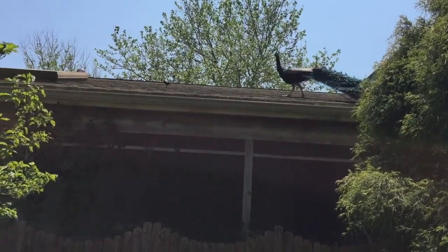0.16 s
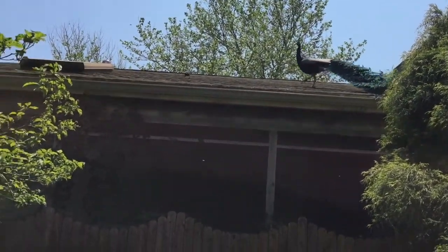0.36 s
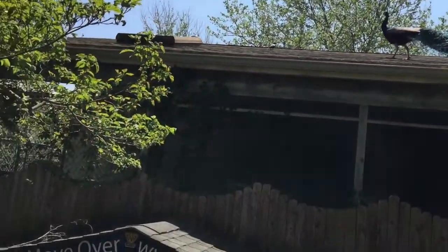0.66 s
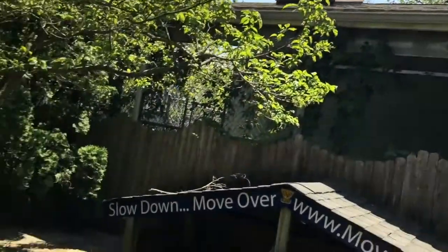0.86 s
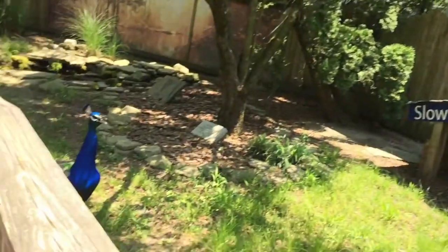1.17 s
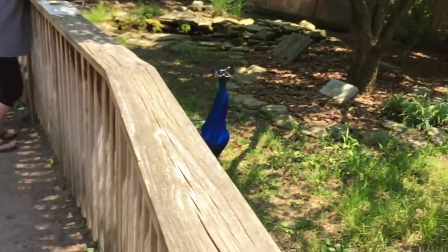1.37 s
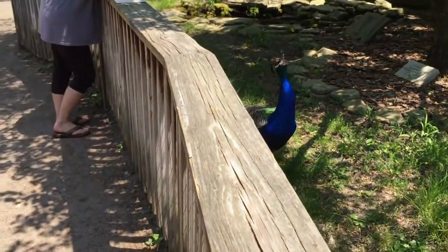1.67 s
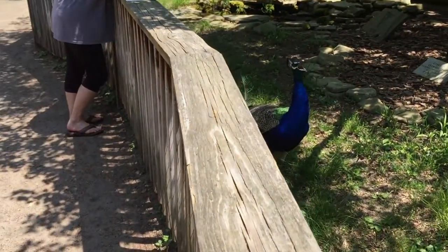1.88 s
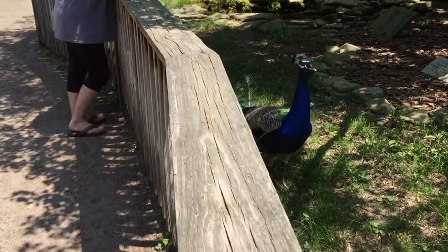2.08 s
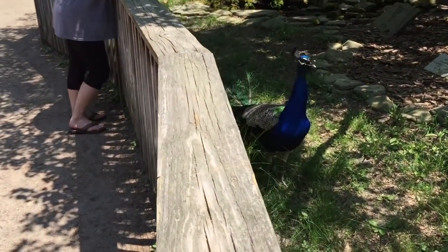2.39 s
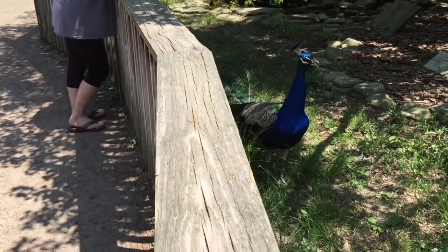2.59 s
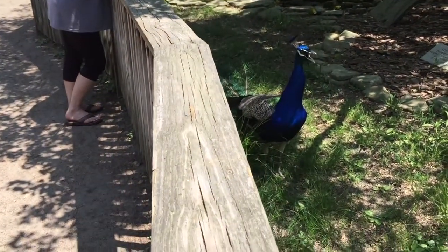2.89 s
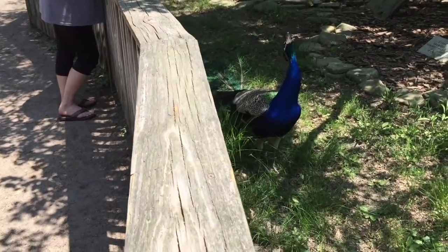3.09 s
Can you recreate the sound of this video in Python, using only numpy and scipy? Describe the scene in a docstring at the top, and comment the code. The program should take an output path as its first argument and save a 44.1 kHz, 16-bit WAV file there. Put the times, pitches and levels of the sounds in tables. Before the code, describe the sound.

Close peacock calls, nasal and brassy with rough breaks, echo lightly off fence, building and trees; between them come quiet outdoor air, distant low hum, a small bird's chirps and one tiny tick.

```python
"""A peacock wails three times close by in an outdoor enclosure; the last wail is cut off by the end.
Each call is a reedy pulse tone of summed harmonics, shaped by two throat resonances and a brassy treble, with rough
breaks; in the first two its weight drops from the upper resonance to the lower. Fence, building and trees echo it.
Behind it a small bird chirps in falling sine sweeps, something ticks in damped modes, machinery hums far off in
wavering sines and the open air washes as coloured noise. The recorder's gain control ducks it all and recovers slowly."""
import sys
import numpy as np
from scipy import signal
from scipy.fft import rfft, irfft
from scipy.io import wavfile
from scipy.ndimage import uniform_filter1d

SR = 44100
rng = np.random.default_rng(int(sys.argv[2]) if len(sys.argv) > 2 else 0)


def file_out(sig):
    """Save sig as 16-bit WAV at sys.argv[1]."""
    # one column per channel
    cols = np.atleast_2d(sig).T
    # limit, then scale
    lim = np.clip(cols, -1, 1)
    pcm = np.round(lim * 32767).astype(np.int16)
    wavfile.write(sys.argv[1], SR, pcm)


N = 143325  # 3.25 s

UPPER_WIDTH_HZ = 303  # width of the upper throat resonance
TREBLE_FROM_HZ, HIGH_FROM_HZ = 2710, 5060  # lower edges of the treble and the high treble
JITTER_HZ = 350  # speed of the voice's irregularity
RELEASE_S = 0.012


def undb(db):
    """Decibels to gain."""
    return 10 ** (np.asarray(db) / 20)


def unit(x):
    """Scale to rms 1."""
    return x / np.sqrt(np.mean(x ** 2))


def walk(rate_hz):
    """Random wander with spread 1, drawn on a coarse grid and slower than about rate_hz."""
    size = 8192
    f = np.arange(size // 2 + 1) * SR / N
    spectrum = rfft(rng.standard_normal(size)) / (1 + (f / rate_hz) ** 4)
    coarse = unit(irfft(spectrum))
    return np.interp(np.arange(N) * size / N, np.arange(size), coarse)


def noise(points):
    """Noise of rms 1, coloured by (f/Hz, level/dB) points joined on a logarithmic frequency axis."""
    hz, db = np.array(points, float).T
    f = np.arange(N // 2 + 1) * SR / N + 1e-9
    colour = undb(np.interp(np.log(f), np.log(hz), db))
    return unit(irfft(rfft(rng.standard_normal(N)) * colour, N))


def bell(x, centre, width):
    """Gaussian hump of height 1; width is its standard deviation."""
    return np.exp(-.5 * ((x - centre) / width) ** 2)


def wavering_tones(rows):
    """Steady sines of (f/Hz, level/dB) whose pitch and level wander a little."""
    waver_hz = 0.57
    total = 0
    for hz, db in rows:
        level = undb(db + walk(4.1))
        phase = 2 * np.pi * np.cumsum(hz + waver_hz * walk(5.0)) / SR
        total = total + level * np.sqrt(2) * np.sin(phase)
    return total


def yard(x):
    """Diffuse echo of trees and walls: decaying noise whose treble dies first."""
    t60_s, treble_t60_s = 0.69, 0.48
    t = np.arange(SR) / SR
    hiss = rng.standard_normal(SR)
    low = signal.sosfilt(signal.butter(2, 1800 / (SR / 2), output="sos"), hiss)
    tail = low * np.exp(-np.log(1000) * t / t60_s)
    tail += 0.71 * hiss * np.exp(-np.log(1000) * t / treble_t60_s)
    tail *= np.minimum(t / 0.022, 1)  # the echoes gather over 22 ms
    return signal.fftconvolve(x, tail / np.sqrt(np.sum(tail ** 2)))[:N]


def open_air_wash():
    """Wash of the open air: coloured noise whose level drifts."""
    # spectrum of the wash: (f/Hz, relative level/dB per Hz)
    wash_colour = [(25, -22), (62, 1.5), (100, -4.5), (170, -7), (260, -10), (430, -16), (650, -11.5),
                   (1200, -12.5), (1700, -10.5), (2800, -14), (4200, -17.5), (5000, -29), (6400, -27.5),
                   (9500, -36.5), (15500, -42)]
    # middle of the drifting level: (t/s, level/dB)
    wash_level = [(0, -36.5), (.8, -44.5), (1.3, -43.5), (1.9, -46), (2.3, -51), (2.7, -46), (3.25, -43)]
    t = np.arange(N) / SR
    level_db = np.interp(t, *np.array(wash_level).T) + 2.6 * walk(2.1)
    return undb(level_db) * noise(wash_colour)


def soft_swell():
    """A soft rush with a little rumble: coloured noise that swells once."""
    # spectrum of the rush: (f/Hz, relative level/dB per Hz)
    rush_colour = [(30, -13.5), (65, 4), (130, -20), (400, -13), (620, 3.5), (850, 2), (1500, -8),
                   (8000, -51)]
    peak_s, spread_s, peak_db = 2.72, 0.36, -45
    return undb(peak_db) * bell(np.arange(N) / SR, peak_s, spread_s) * noise(rush_colour)


def distant_hum():
    """Distant machinery: low wavering sines that recede after a while."""
    # lines of the hum before it recedes: (f/Hz, mean level/dB)
    hum_lines = [(66, -60.5), (140.5, -49), (233, -64)]
    fade_from_s, fade_db_per_s = 0.98, -5
    t = np.arange(N) / SR
    return wavering_tones(hum_lines) * undb(fade_db_per_s * np.maximum(t - fade_from_s, 0))


def passing_whine():
    """A faint whine of wavering sines that comes and goes."""
    # lines of the whine at its strongest: (f/Hz, mean level/dB)
    whine_lines = [(701, -50), (934, -55.5)]
    peak_s, spread_s = 0.89, 0.13
    return wavering_tones(whine_lines) * bell(np.arange(N) / SR, peak_s, spread_s)


def tick():
    """One small dry tick near the microphone: struck modes that die within milliseconds."""
    # modes of the ticking object: (f/Hz, level/dB relative to the tick, t60/s)
    tick_modes = [(2060, -4, 0.021), (2320, -5, 0.016), (3920, -3, 0.017), (6400, -9.5, 0.0095),
                  (12500, -8, .003)]
    tick_s, tick_db = 1.3008, -23.5
    t = np.maximum(np.arange(N) / SR - tick_s, 0)
    modes = 0
    for hz, db, t60 in tick_modes:
        modes = modes + undb(db) * np.exp(-np.log(1000) * t / t60) * np.sin(2 * np.pi * hz * t)
    return undb(tick_db) * modes


def small_bird():
    """A small bird's slightly buzzy down-slurs: falling sines, smeared by the leaves of the trees."""
    # chirps before leaves and yard: (t/s, length/s, start f/Hz, end f/Hz, peak level/dB)
    chirps = [(0.895, 0.037, 4470, 3950, -40.5), (0.917, 0.071, 3577, 3130, -33.5),
              (2.167, .06, 5240, 3700, -48), (2.855, 0.054, 4140, 4060, -37.5),
              (2.885, .025, 3750, 3420, -42)]
    buzz, yard_db, leaf_decay_s = .026, -13, .006  # buzz: share of the pitch
    t, song = np.arange(N) / SR, np.zeros(N)
    for at, length, from_hz, to_hz, db in chirps:
        progress = np.clip((t - at) / length, 0, 1)
        hz = (from_hz + (to_hz - from_hz) * progress) * (1 + buzz * walk(250))
        swell = np.sin(np.pi * progress) ** 2
        song += np.sqrt(2) * undb(db) * swell * np.sin(2 * np.pi * np.cumsum(hz) / SR)
    leaves = rng.standard_normal(N) * np.exp(-t / leaf_decay_s)
    leaves /= np.sqrt(np.sum(leaves ** 2))
    song = song + .5 * signal.fftconvolve(song, leaves)[:N]
    return song + undb(yard_db) * yard(song)


def roughness(t):
    """How rough the voice is at its breaks."""
    # rough stretches: (t/s, spread/s, roughness 0-1)
    breaks = [(0.023, .055, 0.32), (0.198, 0.029, 0.2), (1.444, 0.027, 0.6), (1.714, 0.029, 0.21),
              (2.996, 0.01, 0.6), (3.032, 0.012, 0.7)]
    return sum(amount * bell(t, at, spread) for at, spread, amount in breaks)


def pulse_phase(t, on, hz, rough):
    """Phase of the syrinx pulses, jittered most at the breaks."""
    waver, jitter, rough_jitter = .0008, .00022, .0016  # shares of the pitch
    stumble_rad = .02
    unsteady = waver * walk(27)[on] + (jitter + rough_jitter * rough) * walk(JITTER_HZ)[on]
    phase = 2 * np.pi * np.cumsum(hz * (1 + unsteady)) / SR
    return phase + stumble_rad * rough * walk(JITTER_HZ)[on]  # at a break the pulses come early or late


def near_ripple(f, k, on, flutter):
    """Short reflections make the harmonics ripple as the pitch glides; the third and up also flutter."""
    # ground and railing: (delay/s, gain)
    near_reflections = [(.0034, 0.12), (.0083, 0.11), (0.0136, 0.17)]
    ripple = 1 + sum(gain * np.exp(-2j * np.pi * f * delay) for delay, gain in near_reflections)
    wander = np.array([walk(20)[on] + 1j * walk(18)[on] for _ in k[2:]])
    ripple[2:] += flutter * np.minimum(np.sqrt(k[2:] / 3), 2) * wander
    return ripple


def brassy_treble(f, k, on, rough, ripple, high_db):
    """Brassy colour of the harmonics; it softens toward the top when the high treble is weak."""
    # colour of the treble: (f/Hz, relative level/dB)
    treble_colour = [(2800, 9), (3250, -2.5), (3850, 3), (4400, -3.5), (5100, -12.5), (5750, -9.5),
                     (6400, -9.5), (7400, -18), (9400, -19), (10400, -27.5), (12000, -24.5), (15500, -29.5)]
    flicker_db = 6.5  # spread at full roughness
    soft_tilt, brassy_db = 0.061, -49  # dB per octave lost for each dB of high treble below brassy_db
    flicker = undb(np.array([flicker_db * rough * walk(100)[on] for _ in k]))
    brass = undb(np.interp(f, *np.array(treble_colour).T)) * flicker * np.abs(ripple)
    octaves_up = np.maximum(np.log2(f / HIGH_FROM_HZ), 0)
    return brass * undb(-soft_tilt * np.maximum(brassy_db - high_db, 0) * octaves_up)


def fundamental(t, on, upper_db):
    """Size of the fundamental, which follows the upper resonance and briefly thins out."""
    # hollows in the fundamental: (t/s, spread/s, level change/dB)
    hollows = [(0.255, 0.014, -21), (1.463, 0.0082, -14), (1.59, 0.018, -9.5), (3.03, .013, -1)]
    full_db, full_voice_db = -36, -18.5  # fundamental and upper resonance at full voice, before voice gain
    growth, flicker_db = 0.38, 2  # dB per dB of the upper resonance; dB spread
    size = undb(full_db + growth * (upper_db - full_voice_db) + flicker_db * walk(11)[on])
    return size * undb(sum(db * bell(t, at, spread) for at, spread, db in hollows))


def ringing_lag(f, upper_hz):
    """Each resonance delays the harmonics near it, so that a pulse rings through the whole cycle."""
    # throat resonances that ring on after each pulse: [f/Hz]
    ringing = [1266, 3680, 6000, 9130]
    width_hz = 250
    lag = sum(2 * np.arctan((f - centre) / width_hz) for centre in ringing)
    return lag + 2 * np.arctan((f - upper_hz) / UPPER_WIDTH_HZ)


def breath(on, phase, rough, effort, high_db):
    """Air hiss that pulses with the voice and rises at the breaks and with the high treble."""
    air_db, rough_air_db, treble_air_db = -59, -29, -31  # relative to effort, effort and high treble
    air = noise([(1200, -10), (4000, -11.5), (7000, 1), (9500, -2), (15000, -24)])[on]
    level = effort * (undb(air_db) + undb(rough_air_db) * rough) + undb(high_db + treble_air_db)
    return air * level * (1 + np.cos(phase))


def wail(pitch, throat, flutter):
    """One call: harmonics of the syrinx through two throat resonances and a brassy treble, plus air."""
    attack_s, fade_s_per_harmonic = 0.011, .006
    stumble_shimmer, half_line_db = .16, -32.5
    clock = np.arange(N) / SR
    pitch, throat = np.array(pitch), np.array(throat)
    start, end = throat[0, 0], throat[-1, 0] + 2 * RELEASE_S
    on = (clock >= start) & (clock < end)
    t = clock[on]
    lower_db, upper_db, upper_hz, treble_db, high_db = (
        np.interp(t, throat[:, 0], column) for column in throat.T[1:])
    rough = roughness(t)
    hz = uniform_filter1d(np.interp(t, *pitch.T), size=1000, mode="nearest")  # glides rounded over 23 ms
    phase = pulse_phase(t, on, hz, rough)
    k = np.arange(1, 29)[:, None]  # harmonic numbers
    f = k * hz
    ripple = near_ripple(f, k, on, flutter)
    brass = brassy_treble(f, k, on, rough, ripple, high_db)

    def above(edge_hz):
        """Soft step up at a frequency edge."""
        return .5 + .5 * np.tanh((f - edge_hz) / 120)

    def share(weights, db):
        """Spread one band's level over its harmonics."""
        return weights / np.sqrt(np.sum(weights ** 2, axis=0) + 1e-18) * undb(db)

    size = share(bell(f, upper_hz, UPPER_WIDTH_HZ) * (k > 2), upper_db)
    size += share(brass * above(TREBLE_FROM_HZ) * (1 - above(HIGH_FROM_HZ)), treble_db)
    size += share(brass * above(HIGH_FROM_HZ), high_db)
    size[0] = fundamental(t, on, upper_db)
    size[1] = undb(lower_db)  # the second harmonic carries the lower resonance
    fade = np.clip((end - t) / (fade_s_per_harmonic * k), 0, 1)
    size *= fade ** (1 + (k > 8))  # the upper harmonics die first
    size[8:] *= 1 + stumble_shimmer * rough * walk(JITTER_HZ)[on]

    angles = k * phase - ringing_lag(f, upper_hz) + np.angle(ripple)
    tone = np.sqrt(2) * np.sum(size * np.sin(angles), axis=0)
    # lines at half the pitch spacing appear at the breaks
    tone *= 1 + undb(half_line_db) * rough * walk(39.8)[on] * np.cos(phase / 2)
    effort = np.hypot(undb(lower_db), undb(upper_db))
    air = breath(on, phase, rough, effort, high_db)
    gate = np.clip((t - start) / attack_s, 0, 1) * np.clip((end - t) / RELEASE_S, 0, 1)
    call = np.zeros(N)
    call[on] = (tone + air) * np.sin(np.pi / 2 * gate) ** 2
    return call


def peacock():
    """The close calls, dull delayed echoes from fence and building, and the diffuse yard."""
    # one table per call: (t/s, pitch f/Hz)
    call_pitch = [
        [(0.0, 612), (0.208, 626.4), (0.33, 644), (0.44, 631.5), (0.51, 615), (0.624, 569), (0.66, 537)],
        [(1.355, 556), (1.411, 593.7), (1.469, 622.6), (1.679, 649.2), (1.753, 687.8), (1.819, 692.3),
         (1.869, 683), (1.979, 641.8), (2.119, 561.1), (2.165, 533)],
        [(2.915, 566), (2.927, 565.3), (2.961, 596.7), (3.019, 621), (3.099, 636), (3.197, 644.3),
         (3.25, 655.7)],
    ]
    # one table per call, levels before voice gain: (t/s, lower resonance level/dB, upper resonance level/dB,
    # upper resonance f/Hz, treble level/dB, high treble level/dB)
    call_throat = [
        [(0.0, -22, -17.5, 2226, -27.5, -36), (0.1, -21.5, -16, 2400, -30.5, -41.5),
         (0.178, -25.5, -15.5, 2370, -29, -45.5), (0.212, -21.5, -21, 2140, -27.5, -32.5),
         (0.24, -22.5, -21.5, 2280, -27, -36), (0.258, -19, -19, 2150, -22, -37.5),
         (0.288, -13.5, -28, 2080, -27.5, -43), (0.306, -15.5, -23, 2340, -28, -38),
         (0.33, -15, -21, 2430, -35, -40.5), (0.378, -13, -31, 2320, -36, -44.5),
         (0.404, -13.5, -30, 2000, -31.5, -40.5), (0.478, -20.5, -32, 2128, -36, -40),
         (0.524, -23.5, -27.5, 1900, -33, -38.5), (0.564, -31.5, -30, 1850, -36.5, -42.5),
         (0.596, -28.5, -29.5, 1780, -38, -44), (0.645, -42, -44.5, 1720, -43.5, -53)],
        [(1.352, -53, -75, 2080, -68, -68), (1.365, -34, -21, 2055, -39.5, -53),
         (1.384, -32.5, -16, 2010, -28, -36.5), (1.424, -19, -18, 1990, -17, -24.5),
         (1.464, -20, -15.5, 2230, -29.5, -34), (1.495, -20.5, -15, 2100, -23.5, -28),
         (1.57, -20.5, -17, 2080, -19.5, -26), (1.63, -23, -14.5, 2100, -23, -26),
         (1.7, -22, -17, 2090, -21, -26), (1.748, -12.5, -32, 2360, -25.5, -34.5),
         (1.814, -13, -28.5, 2540, -43.5, -34), (1.954, -14, -55.5, 2554, -47.5, -48),
         (1.996, -19.5, -47.5, 1917, -54.5, -53), (2.08, -24.5, -39, 1770, -39.5, -54.5),
         (2.13, -46.5, -46, 1690, -49.5, -58), (2.17, -52, -90, 1654, -66, -90)],
        [(2.914, -30, -46, 1770, -48, -59), (2.923, -31, -14, 1730, -46, -50),
         (2.936, -28, -16.5, 1890, -28, -45), (2.956, -20.5, -12, 1950, -25, -35),
         (2.98, -19, -17.5, 1950, -18.5, -38.5), (2.994, -18.5, -16, 2170, -21, -25.5),
         (3.004, -18, -13.5, 2260, -22, -25.5), (3.036, -16.5, -16, 2250, -28, -34.5),
         (3.078, -19.5, -14.5, 2110, -20, -25.5), (3.13, -21.5, -14, 2080, -23.5, -30.5),
         (3.2, -25.5, -14, 2040, -27, -29), (3.24, -24, -19.5, 2070, -21.5, -21)],
    ]
    # one row per call: (strength of its echoes level/dB, flutter of the single harmonics 0-1)
    call_scatter = [(0.5, 0.21), (-4, 0.18), (-5, 0.25)]
    # fence and building: (delay/s, level/dB relative to the sound thrown at them)
    wall_echoes = [(.027, -17), (0.061, -20.5), (0.141, -33.5), (0.259, -39)]
    voice_gain_db, yard_db, echo_top_hz = 9, -24.5, 1960
    t = np.arange(N) / SR
    calls = [undb(voice_gain_db) * wail(pitch, throat, flutter)
             for pitch, throat, (_, flutter) in zip(call_pitch, call_throat, call_scatter)]
    thrown = sum(undb(db) * call for call, (db, _) in zip(calls, call_scatter))
    dull = signal.sosfilt(signal.butter(2, echo_top_hz / (SR / 2), output="sos"), thrown)
    echoes = sum(undb(db) * np.interp(t - delay, t, dull, left=0) for delay, db in wall_echoes)
    return sum(calls) + echoes + undb(yard_db) * yard(thrown)


def scene():
    """Everything at the one microphone."""
    background = open_air_wash() + soft_swell() + distant_hum() + passing_whine()
    return (background + tick() + small_bird() + peacock())[None]


def record(dry):
    """Recorder: gain control that ducks fast and recovers slowly, then a steep cut of the top."""
    threshold_db, range_db, release_db_per_s = -16, 10.5, 14.5
    top_hz = 15750
    power = np.abs(uniform_filter1d(dry[0] ** 2, size=200))  # over 4.5 ms
    over_db = 10 * np.log10(power + 1e-12) - threshold_db
    recovery = release_db_per_s * np.arange(N) / SR
    # up to 7 dB beyond the range is remembered, which delays the recovery
    held_db = np.maximum.accumulate(np.clip(over_db, 0, range_db + 7) + recovery) - recovery
    gain = undb(-uniform_filter1d(np.minimum(held_db, range_db), size=200))
    return signal.sosfilt(signal.ellip(10, .2, 70, top_hz, fs=SR, output="sos"), dry * gain)


dry = scene()
out = record(dry)
file_out(out)
```